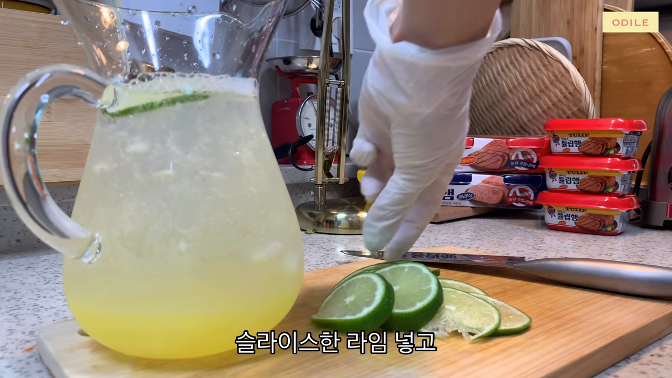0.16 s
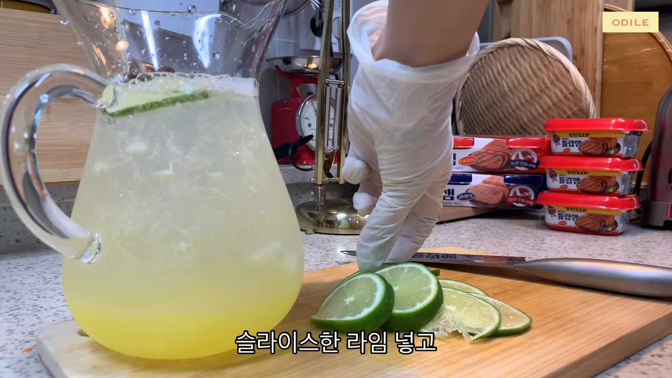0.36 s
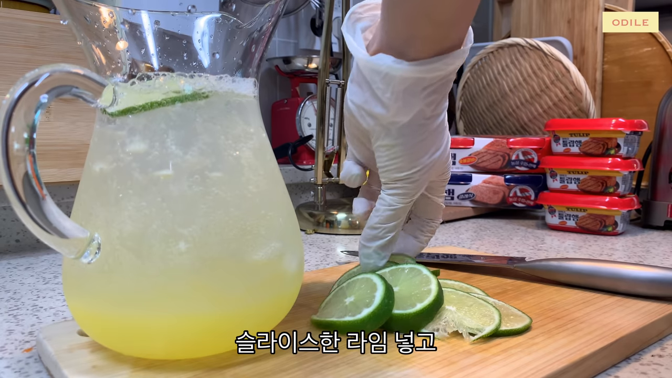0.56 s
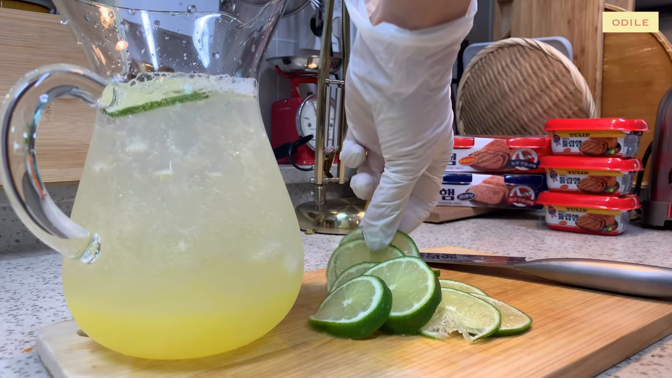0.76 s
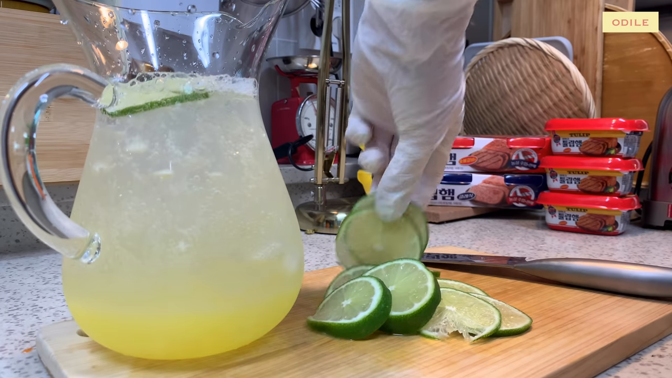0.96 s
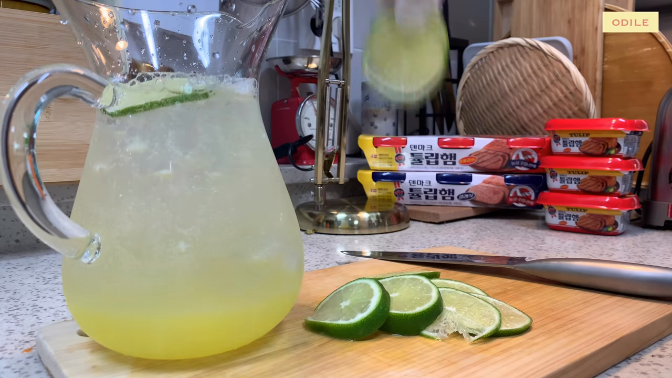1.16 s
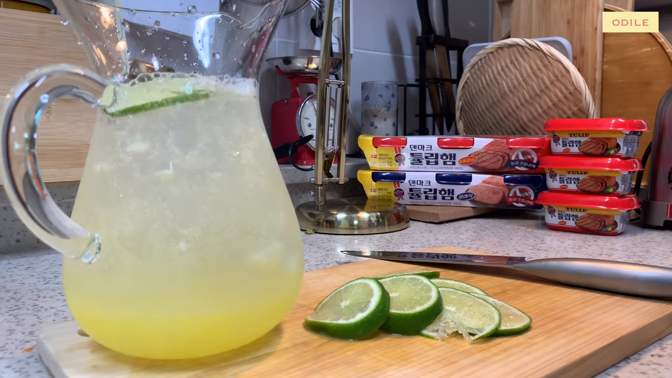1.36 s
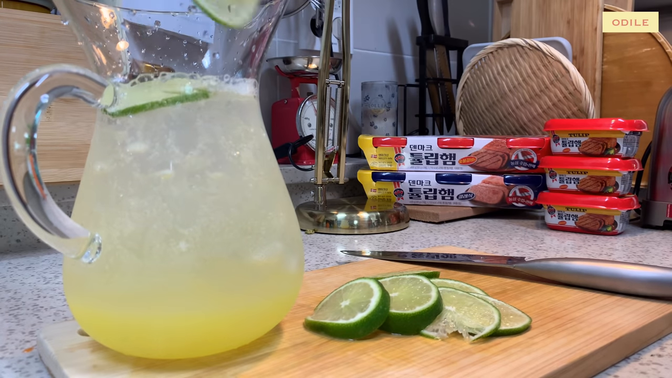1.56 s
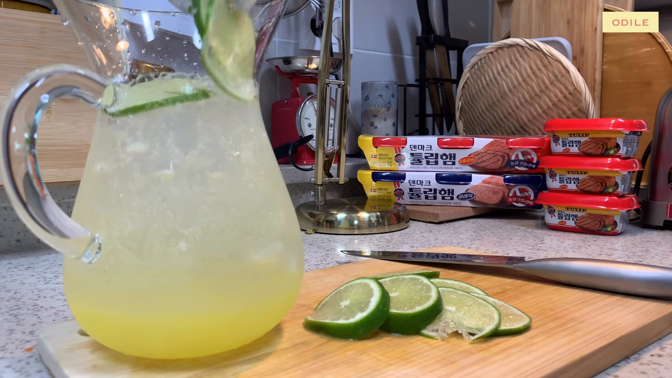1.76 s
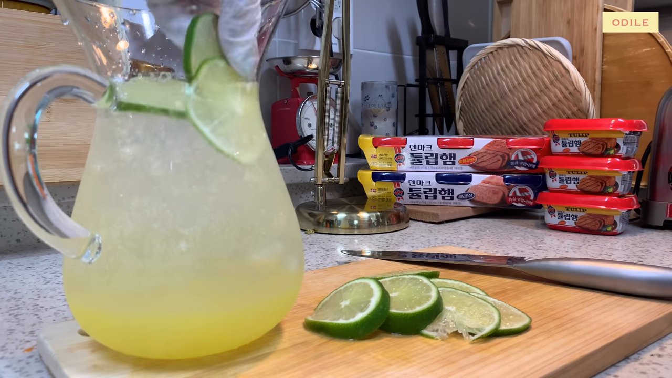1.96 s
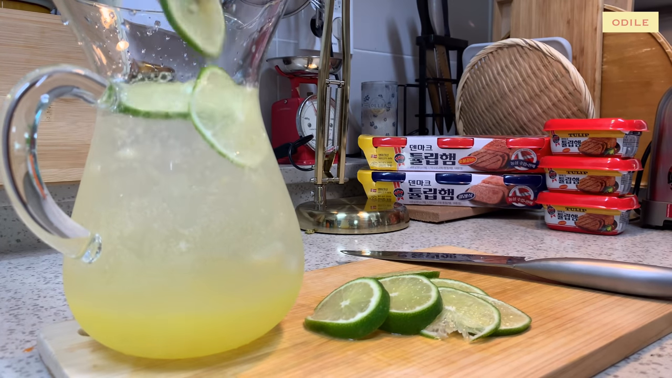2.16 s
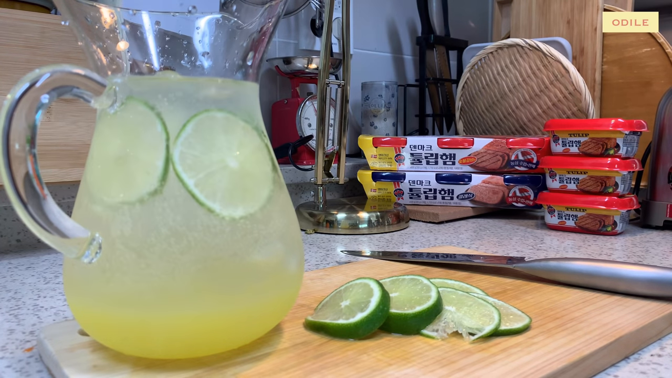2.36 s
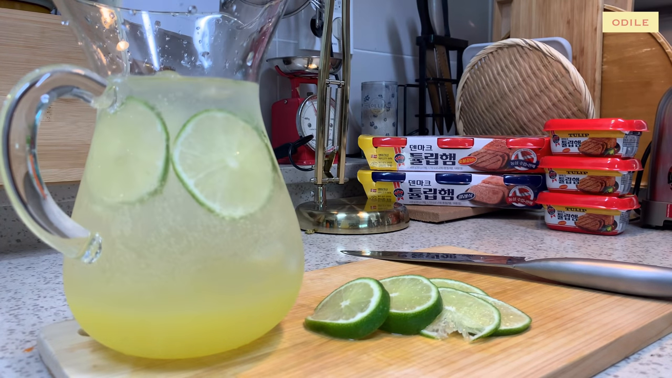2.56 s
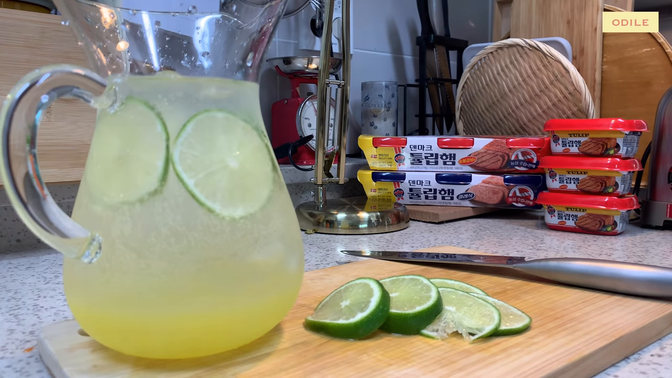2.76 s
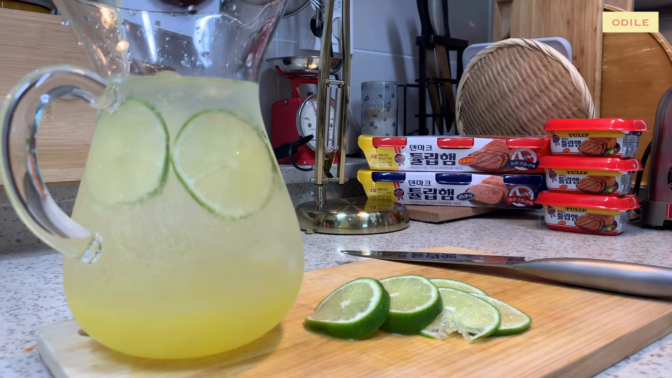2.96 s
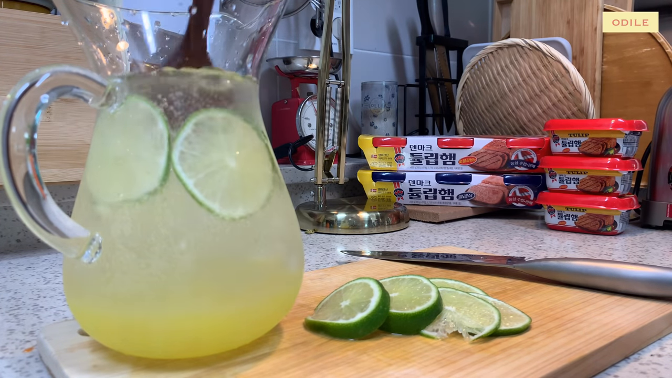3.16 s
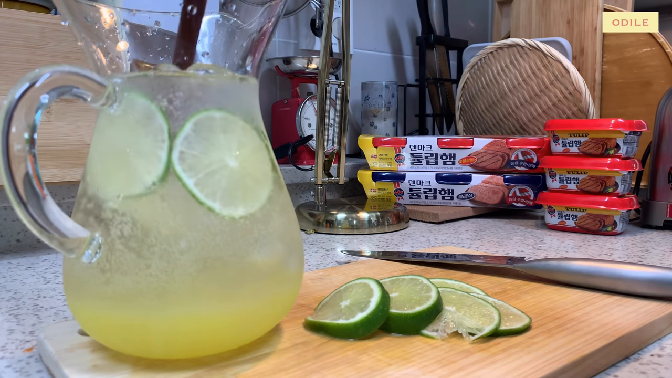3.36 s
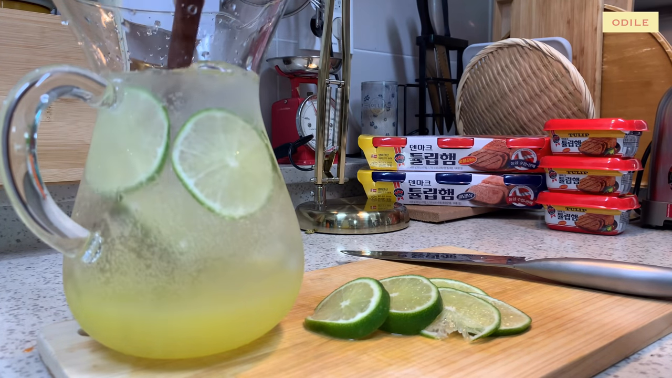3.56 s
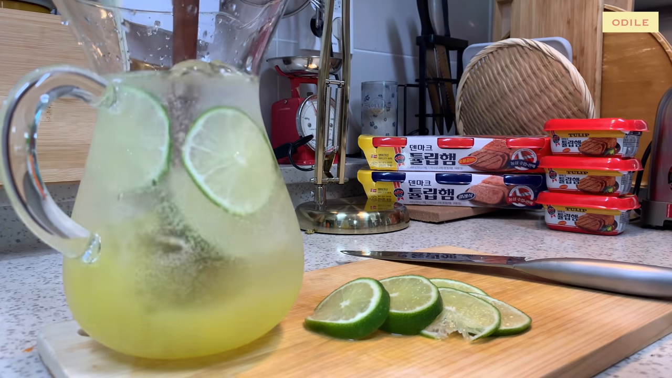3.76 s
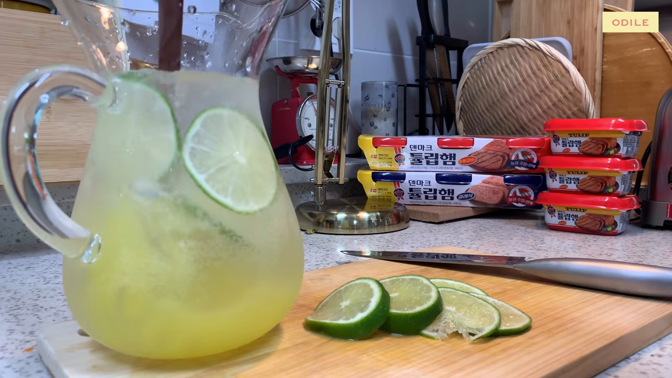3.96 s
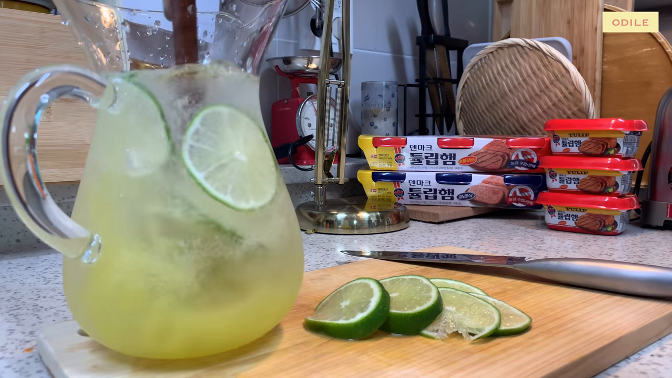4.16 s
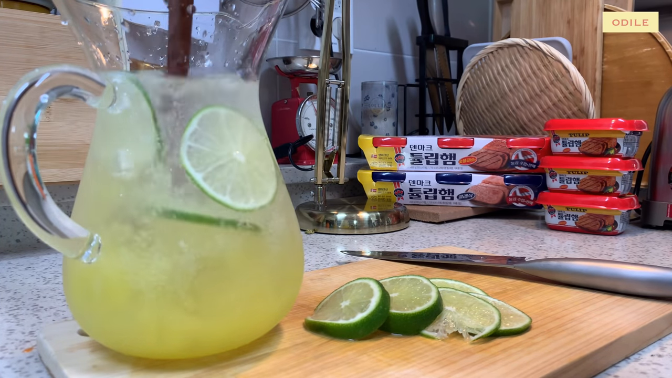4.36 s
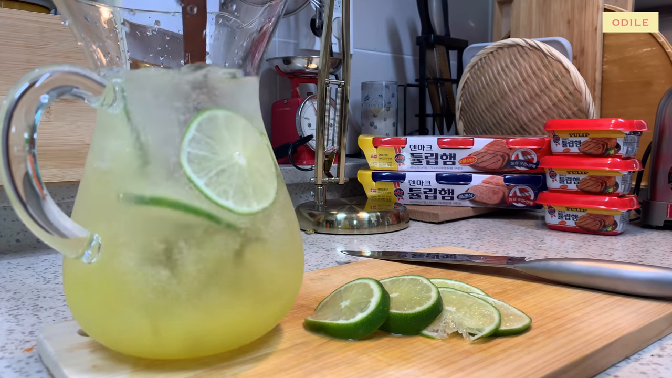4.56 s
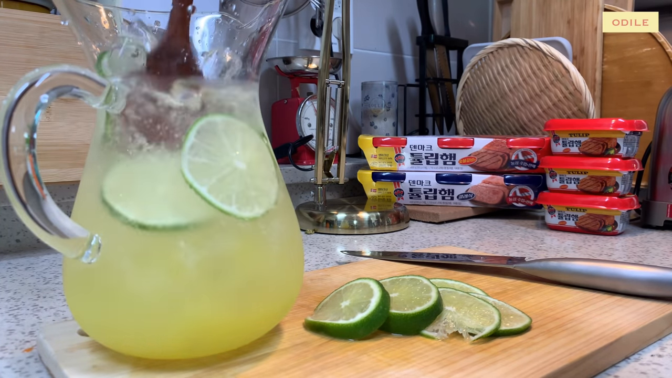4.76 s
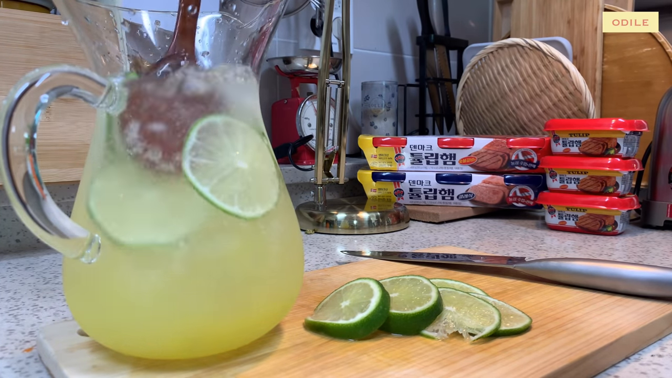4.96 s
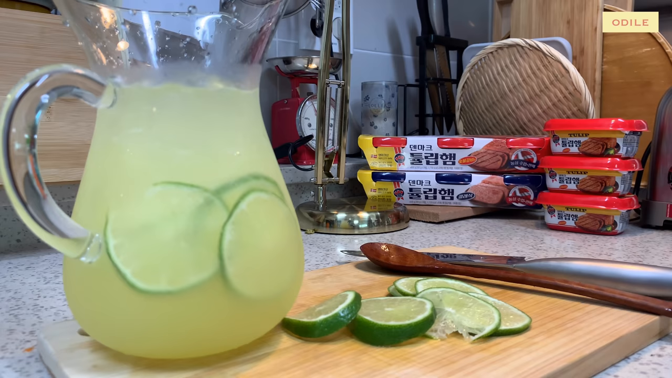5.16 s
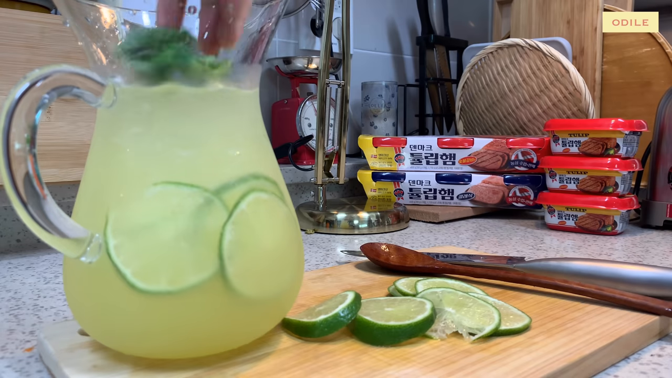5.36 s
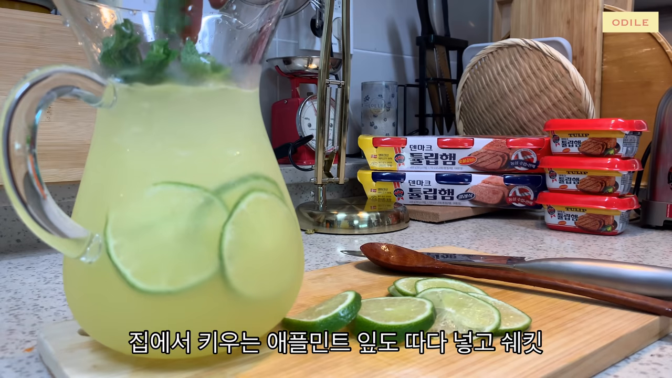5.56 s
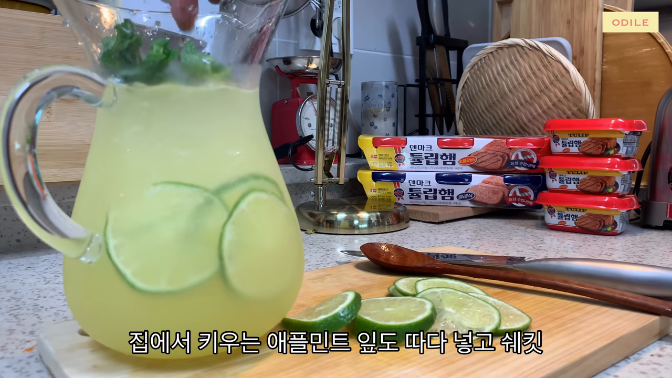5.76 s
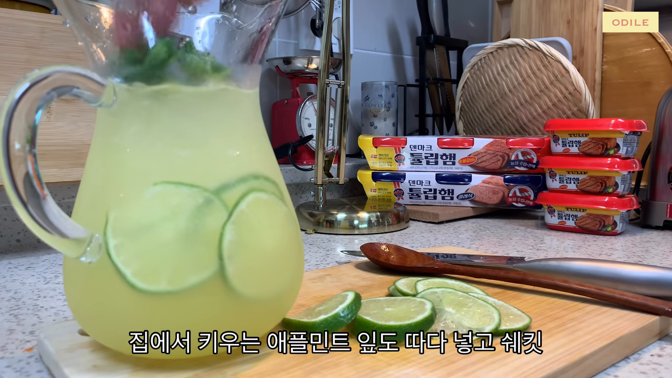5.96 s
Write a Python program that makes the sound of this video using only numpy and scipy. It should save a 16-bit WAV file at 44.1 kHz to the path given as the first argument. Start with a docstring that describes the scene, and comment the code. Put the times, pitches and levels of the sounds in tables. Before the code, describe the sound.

A wooden spoon stirs ice cubes and lime slices in a glass pitcher of fizzy drink, clinking and sloshing over a quiet refrigerator hum.

```python
"""A refrigerator hums in a quiet kitchen; a gloved hand crinkles, picks up slices and drops them in a pitcher.
A wooden spoon then stirs ice cubes and lime in the fizzy drink, and at the end leaves rustle at the rim.
Ice and glass are decaying modes struck by rattles; fizz and rustle are coloured grains of noise;
slosh is low noise with rising gurgles, and thumps are sinking tones. Sparse echoes give the room.
A close pair of microphone ports hears it all."""
import sys
import numpy as np
from scipy import signal
from scipy.fft import rfft, irfft
from scipy.io import wavfile
from scipy.ndimage import uniform_filter1d

SR = 44100
rng = np.random.default_rng(int(sys.argv[2]) if len(sys.argv) > 2 else 0)


def convert_level_to_amplitude(level_db):
    """Map a level in decibels to its linear amplitude factor."""
    exponent = np.asarray(level_db, float) / 20
    return 10 ** exponent


def store_wav(level_fs):
    """Save 16-bit WAV to argv[1]."""
    pcm = np.round(np.clip(np.atleast_2d(level_fs), -1, 1) * 32767)
    wavfile.write(sys.argv[1], SR, pcm.T.astype(np.int16))


N = 264600  # samples, 6 s

# the spoon goes round: time_s, jostle_of_cubes_db, fizz_and_splash_db, slosh_db
STIR = [(2.985, -48, -54, -45), (3.03, -42.5, -48.5, -49.5), (3.15, -44.5, -48, -50.5),
        (3.24, -53.5, -56, -42), (3.38, -41, -35.5, -45), (3.45, -45, -43.5, -35.5), (3.55, -41, -40, -52),
        (3.67, -42.5, -40, -42), (3.785, -45, -52.5, -54), (3.815, -37.5, -37, -49),
        (3.87, -36, -38.5, -41), (4.03, -46, -47.5, -50), (4.1, -37.5, -38, -49.5),
        (4.3, -42, -38.5, -49.5), (4.39, -43, -55, -47), (4.45, -40.5, -36, -48), (4.65, -37.5, -36, -45),
        (4.78, -41.5, -43.5, -52), (4.9, -35.5, -32.5, -45.5), (5.02, -47.5, -50, -50.5),
        (5.06, -46, -40.5, -46.5), (5.123, -53, -35.5, -49.5)]
# slices sink among the cubes, then the surface fizzes; two passages with the columns of STIR
DROPS = [
    [(1.7, -60, -64, -63), (1.78, -55.5, -68, -52), (1.876, -54, -58.5, -59), (1.93, -59.5, -68, -60),
     (2.195, -68, -73, -72)],
    [(2.25, -80, -73, -82), (2.4, -68.5, -67.5, -80), (2.49, -92, -82, -85), (2.6, -86, -97, -90)],
]


def evened(x):
    """Scales to an rms of 1."""
    return x / np.sqrt(np.mean(x ** 2) + 1e-20)


def read(points, hz):
    """Reads a spectrum table on a log-frequency axis."""
    f, value = np.transpose(points)
    return np.interp(np.log(hz + 1), np.log(f + 1), value)


def gain_over_time(tables, column=1):
    """Sums the gains that tables of dB draw over time, silent outside them."""
    t = np.arange(N) / SR
    gain = 0
    for rows in map(np.array, tables):
        gain = gain + convert_level_to_amplitude(np.interp(t, rows[:, 0], rows[:, column], -200, -200))
    return gain


def coloured(x, points):
    """Filters by a spectrum table, then scales to an rms of 1."""
    gain = convert_level_to_amplitude(read(points, np.fft.rfftfreq(N, 1 / SR)))
    return evened(irfft(rfft(x) * gain, N))


def grains(per_s, spread_db):
    """Sparse clicks of random sign at random moments; a few are large."""
    size = convert_level_to_amplitude(spread_db * np.minimum(rng.exponential(1, N), 4))
    sign = rng.choice([-1., 1.], N)
    return size * sign * (rng.random(N) < per_s / SR)


def add(mix, start_s, sound):
    """Lays a sound into the mix."""
    part = mix[round(start_s * SR):][:len(sound)]
    part += sound[:len(part)]


def refrigerator(steady=0.92):
    """Each hum line is a steady tone with a slow random waver around it."""
    # hum lines: pitch_hz, level_db, waver_width_hz
    hum_lines = [(54, -69, 15), (118.8, -55.5, 6), (238, -55.5, 2.4), (565.5, -72.5, 2.4),
                 (745, -84.5, 3.5), (948, -82.5, 7.7), (1520, -92, 8)]
    t, out = np.arange(N) / SR, 0
    for hz, level_db, width in hum_lines:
        r = np.exp(-np.pi * width / SR)
        noise = rng.standard_normal(N) + 1j * rng.standard_normal(N)
        waver = signal.lfilter([1], [1, -2 * r, r * r], noise)
        waver /= np.sqrt(np.mean(abs(waver) ** 2))
        envelope = steady + np.sqrt(1 - min(steady, 1) ** 2) * waver
        tone = (envelope * np.exp(2j * np.pi * hz * t)).real
        out = out + convert_level_to_amplitude(level_db) * np.sqrt(2) * tone
    return out


def kitchen_air(patchy_db=1.5, air_db=-55.5):
    """Broad rumble and faint hiss with drifting patches; the ports share the bass and differ in treble."""
    # spectrum of the air: pitch_hz, relative_level_db
    air_colour = [(20, -19.5), (50, -1.5), (114, -11), (166, -11.5), (236, -5.5), (309, -19.5), (560, -22),
                  (641, -30), (962, -30), (1230, -40), (2500, -43.5), (4500, -47), (8000, -43),
                  (15500, -50)]
    # likeness of the air at the two ports: pitch_hz, likeness_share
    air_likeness = [(40, .97), (100, .9), (250, .75), (550, .1), (1500, .1)]
    frames, hz = N // 512 + 5, np.fft.rfftfreq(2048, 1 / SR)
    a, b, c, d, patches = rng.standard_normal((frames, 1025, 5)).T
    patches = evened(uniform_filter1d(uniform_filter1d(patches, 16, 0), 8, 1))
    same = np.clip(read(air_likeness, hz), -1, 1)[:, None]
    left = a + 1j * b
    right = same * left + np.sqrt(1 - same ** 2) * (c + 1j * d)
    z = np.array([left, right])
    z *= convert_level_to_amplitude(read(air_colour, hz)[:, None] + patchy_db * patches)
    air = signal.istft(z, nperseg=2048, noverlap=1536)[1][:, :N]
    return convert_level_to_amplitude(air_db) * evened(air)


def rustle():
    """Crinkling glove, slices and leaves: swells of fine grains, and a few short bursts of noise as snaps."""
    # crinkles: peak_s, peak_gain_db, rise_db_per_s, fall_db_per_s
    crinkles = [(0.17, -72, 42, 40), (0.456, -78, 500, 150), (0.56, -79, 150, 150),
                (0.622, -65.5, 900, 152), (0.836, -62, 302, 1500), (0.86, -78, 300, 32),
                (2.746, -77, 700, 330), (2.806, -75, 900, 190), (5.23, -78, 900.5, 44),
                (5.326, -57, 1507, 900), (5.401, -62.5, 162, 408.5), (5.56, -74, 35.5, 401),
                (5.938, -46, 3000, 40)]
    # spectrum of the grains: pitch_hz, relative_level_db
    rustle_colour = [(500, -9), (900, -10.5), (2500, -1), (4000, -8.5), (6000, -8.5), (8000, -5.5),
                     (11000, -19), (15500, -16.5), (17000, -26)]
    # snaps: start_s, start_level_db
    snaps = [(0.266, -59), (0.517, -58), (0.531, -52.5), (0.542, -55), (0.558, -57), (0.622, -56),
             (0.669, -55), (0.831, -54), (2.9617, -44), (5.139, -51), (5.2275, -60), (5.27, -55),
             (5.3258, -46), (5.3947, -48), (5.9365, -62), (5.948, -43), (5.9694, -48)]
    peak_s, peak_db, rise, fall = np.transpose(crinkles)[:, :, None]
    late = np.arange(N) / SR - peak_s
    swells = convert_level_to_amplitude(peak_db + np.minimum(rise * late, -fall * late)).sum(0)
    out = swells * coloured(grains(2500, 5.8), rustle_colour)
    t = np.arange(900) / SR
    snap_t60_s = 0.012
    for (start_s, start_db), noise in zip(snaps, rng.standard_normal((len(snaps), 901))):
        burst = noise[1:] - 0.091 * noise[:-1]  # slightly brighter than white
        add(out, start_s, convert_level_to_amplitude(start_db - 60 * t / snap_t60_s) * burst)
    return out


def clink(knock_db, ring_db, crack_db, rattle_s, luck, uneven_db=3, first=2.1, rise_s=.001):
    """One cube strikes: a first contact and a rattle ring every mode by its own chance amount."""
    # ice cubes, heavily damped by the drink: pitch_hz, level_db, t60_s, pitch_spread_share
    ice_modes = [(575, -22, 0.014, 0.32), (840, -16, 0.012, 0.027), (1075, -5, 0.0062, .1),
                 (1326, -8.5, 0.017, 0.019), (1613, -3.5, 0.014, 0.069), (1985, 1, 0.0049, 0.023),
                 (2530, -7, .007, 0.36), (2980, -9, 0.009, 0.047), (4400, 6.5, 0.00063, 0.13),
                 (4940, -0.5, 0.0045, 0.1), (6070, 4.5, 0.0034, 0.19), (7320, 7.5, 0.0051, 0.089),
                 (9114, 3, 0.0044, 0.061), (11440, 4, 0.0014, 0.033), (12700, -10, 0.0024, 0.03),
                 (15000, -10.5, .002, 0.054)]
    # the pitcher's wall: pitch_hz, level_db, t60_s, pitch_spread_share
    glass_modes = [(2525, -0.5, 0.0085, 0.066), (3305, -12, 0.024, 0.011), (3572, -8, 0.015, 0.0058),
                   (3727, -5, 0.018, 0.0034), (3765, -7, 0.0057, 0.0083), (4210, -13.5, 0.024, 0.0018)]
    hz, db, t60, spread = np.transpose(ice_modes + glass_modes)[:, :, None]
    count = len(hz)
    detune, uneven, contacts = luck[:count, None], luck[count:2 * count, None], luck[2 * count:]

    # the ice modes blend from dull knock at 1400 Hz to sharp crack at 6000 Hz
    part_db = np.interp(np.log(hz), np.log([1400, 6000]), [knock_db, crack_db])
    part_db[len(ice_modes):] = ring_db
    t = np.arange(1800) / SR
    decay = convert_level_to_amplitude(part_db + db + uneven_db * uneven - 60 * t / t60)
    rings = decay * np.sin(2 * np.pi * hz * (1 + spread * detune) * t)

    t = t[:len(contacts)]
    envelope = np.exp(-t / max(rattle_s, 1e-4)) * (1 - np.exp(-t / rise_s))
    rattle = contacts ** 3 * envelope  # cubed: a few contacts stand out
    rattle /= abs(rattle).max()
    rattle[round(rise_s * SR / 2)] = first
    return signal.fftconvolve(rings.sum(0), rattle / np.linalg.norm(rattle))


def blows():
    """The distinct clinks: short ones are one clean contact, long ones swell into a rattle."""
    # ice blows, single ticks to long rattles: start_s, dull_knock_db, glass_ring_db, crack_db, rattle_s
    blow_rows = [(1.719, -45, -39.5, -54, 0.0041), (1.756, -28.5, -48, -63, 0.0016),
                 (1.819, -34, -56, -67, 0.0076), (1.852, -31.5, -43.5, -57, 0.0033),
                 (1.954, -36.5, -51, -73, 0.0046), (2.009, -52, -48, -53.5, .004),
                 (2.063, -44.5, -48, -81, .005), (2.116, -52, -41.5, -51, 0.0024),
                 (2.311, -50.5, -56, -39, 0.0014), (2.984, -24, -31, -31.5, 0.0024),
                 (3.003, -63, -25.5, -24, 0.0056), (3.061, -53, -55, -34.5, 0.0015),
                 (3.071, -43, -48, -30.5, 0.0036), (3.123, -53, -33, -25.5, 0.0024),
                 (3.1405, -61, -54, -39, 0.0013), (3.154, -34.5, -60, -26, .002),
                 (3.18, -43, -59, -31, .001), (3.210, -22.5, -53, -33, 0.0054),
                 (3.223, -64, -61, -23, 0.0051), (3.2514, -52, -60, -30, 0.0017),
                 (3.3, -23.5, -55, -32, 0.0049), (3.323, -37, -62, -28.5, 0.0011),
                 (3.36, -25.5, -45, -30, 0.0096), (3.424, -24.5, -57, -30.5, 0.0041),
                 (3.441, -28.5, -34, -20, 0.0041), (3.561, -27, -31, -40, 0.0033),
                 (3.585, -64, -39, -26, 0.0032), (3.612, -39, -30, -25.5, 0.0091),
                 (3.632, -50, -43, -30, 0.0022), (3.6553, -27.5, -42, -33, .001),
                 (3.691, -30, -37, -25, .004), (3.818, -31, -24, -26.5, .002),
                 (3.828, -27, -21, -21.5, 0.011), (3.863, -26, -28, -22.5, .005),
                 (3.915, -42, -50, -20.5, 0.0052), (3.963, -20.5, -48, -21, 0.0031),
                 (4.01, -51, -33, -37, .002), (4.052, -29.5, -33, -19.5, 0.0013),
                 (4.08, -40.5, -34, -23, 0.0054), (4.094, -31.5, -38.5, -26, 0.0019),
                 (4.101, -42, -50, -31, 0.0015), (4.125, -26, -50, -27.5, 0.0039),
                 (4.164, -32.5, -40, -29.5, .003), (4.262, -28.5, -37, -44, 0.0024),
                 (4.275, -23.5, -19.5, -22, 0.0084), (4.307, -50.5, -34.5, -22.5, 0.00075),
                 (4.313, -42.5, -37.5, -22, .002), (4.367, -24, -57, -54, 0.0038),
                 (4.436, -38.5, -24.5, -44, 0.003), (4.449, -27, -49.5, -29, 0.0037),
                 (4.482, -57.5, -32.5, -21, .003), (4.4904, -56, -33.5, -35, 0.00085),
                 (4.535, -42, -29, -40, .004), (4.557, -43, -31, -27, .004), (4.570, -40.5, -31, -38, .002),
                 (4.641, -34, -22, -18.5, 0.0057), (4.696, -48, -16.5, -18.5, 0.0031),
                 (4.717, -27.5, -17.5, -29, 0.0095), (4.746, -28.5, -22, -39.5, 0.0036),
                 (4.794, -37, -19.5, -24.5, 0.0057), (4.829, -19.5, -13, -22.5, 0.0074),
                 (4.856, -39.5, -22.5, -26.5, 0.0046), (4.866, -17.5, -22, -34.5, .006),
                 (4.912, -46.5, -26, -32.5, .002), (4.921, -47, -16.5, -23, 0.0077),
                 (5.001, -46, -32, -27.5, 0.0011), (5.035, -40, -21, -27.5, 0.0035),
                 (5.056, -40.5, -46.5, -26, 0.0082), (5.084, -59, -41.5, -20.5, 0.0039),
                 (5.105, -53, -22, -25, 0.004)]
    build_share = 0.6  # a rattle builds over this share of its length
    clean_s = 0.0028  # in a rattle this short the first contact is as strong as the strongest
    out, luck = np.zeros(N), rng.standard_normal((len(blow_rows), 1800))
    for (start_s, *parts, rattle_s), chance in zip(blow_rows, luck):
        first, rise_s = clean_s / rattle_s, build_share * rattle_s
        add(out, start_s, clink(*parts, rattle_s, chance, first=first, rise_s=rise_s))
    return out


def jostle(knock_db, ring_db, crack_db, per_s, spread_db):
    """Cubes nudge each other or the wall all the time: a rain of small clinks of nine shapes."""
    hits, cube = grains(per_s, spread_db), rng.integers(0, 9, N)
    out = 0
    for k, chance in enumerate(rng.standard_normal((9, 500))):
        shape = clink(knock_db, ring_db, crack_db, 0.0047, chance)
        out = out + signal.oaconvolve(hits * (cube == k), shape)[:N]
    return evened(out)


def churn():
    """Jostling cubes and bursting bubbles; the fizz comes in clumps as cubes break the surface."""
    # spectrum of the fizz: pitch_hz, relative_level_db
    fizz_colour = [(300, -28.5), (1500, -4.5), (3000, 3.5), (4500, 0), (7500, 0.5), (9500, -3),
                   (12000, -8.5), (15500, -11), (17000, -35)]
    drift = evened(uniform_filter1d(rng.standard_normal(N), 250))
    clumps = convert_level_to_amplitude(6 * np.clip(drift, -3, 1.5))
    fizz = coloured(clumps * grains(2500, 5.0), fizz_colour)
    cubes = jostle(0, -24.5, -12.5, 250, 2.9)
    wall = jostle(-39.5, 0, -39.5, 300, 1.4)
    # cubes slide on the glass, in dB relative to the jostle: more as the swirl builds
    swirl = convert_level_to_amplitude(-13 + 7.5 * (np.arange(N) / SR - STIR[0][0]))
    passages = DROPS + [STIR]
    bubbling = gain_over_time(passages, column=2) * fizz
    return gain_over_time(passages) * cubes + bubbling + gain_over_time([STIR]) * swirl * wall


def gurgles(per_s=120):
    """Pockets of air under the spoon: short low tones that slide upward."""
    hits, pocket, out = grains(per_s, 5.1), rng.integers(0, 6, N), 0
    t = np.arange(3000) / SR
    envelope = convert_level_to_amplitude(-60 * t / 0.041) * (1 - np.exp(-t / .003))
    for k, hz in enumerate(np.geomspace(150, 310, num=6)):
        tone = np.sin(2 * np.pi * hz * (t + 4 * t ** 2)) * envelope
        out = out + signal.oaconvolve(hits * (pocket == k), tone)[:N]
    return evened(out)


def rocking():
    """Slosh of low noise and gurgles, with thumps whose pitch sinks as the pitcher rocks on the board."""
    # spectrum of the slosh noise: pitch_hz, relative_level_db
    slosh_colour = [(30, -24), (60, -0.5), (180, 4), (300, 9), (400, -24.5), (900, -38)]
    # the spoon meets the bottom: start_s, level_db (before rise and decay), rest_pitch_hz
    thumps = [(3.028, -27, 50), (3.216, -28.5, 58), (3.368, -32, 55), (3.439, -37, 55), (3.97, -17.5, 48),
              (4.375, -19.5, 48), (4.488, -37, 50), (4.664, -28, 85), (4.847, -32, 60), (4.94, -31, 80)]
    slosh = 0.61 * coloured(rng.standard_normal(N), slosh_colour) + 0.61 * gurgles()
    out = gain_over_time(DROPS + [STIR], column=3) * slosh
    t = np.arange(6000) / SR
    for start_s, level_db, rest_hz in thumps:
        turns = np.cumsum(rest_hz + 90 * np.exp(-t / 0.0099)) / SR
        envelope = convert_level_to_amplitude(level_db - 60 * t / 0.16) * (1 - np.exp(-t / 0.021))
        add(out, start_s, np.sin(2 * np.pi * turns) * envelope)
    return out


def walls(x, half_turns_per_s=4):
    """Sparse reflections, each band dying at its own speed; three sets take turns as the sources move."""
    # decay of the kitchen's echoes: pitch_hz, t60_s
    kitchen_t60 = [(250, 0.099), (1000, 0.14), (4000, 0.15), (12000, 0.085)]
    taps = np.zeros((3, 2, 10000))  # set, port, sample
    at = np.arange(60, 9960, 20) + rng.integers(0, 20, (3, 2, 495))
    np.put_along_axis(taps, at, rng.choice([-1., 1.], at.shape), 2)
    hz, t, z = signal.stft(taps, SR, nperseg=256)
    decay = convert_level_to_amplitude(-60 * t / read(kitchen_t60, hz)[:, None])
    tails = signal.istft(z * decay, SR, nperseg=256)[1]
    turn = np.pi * (half_turns_per_s * np.arange(len(x)) / SR + np.arange(3)[:, None] / 3)
    shares = np.sqrt(2 / 3) * np.cos(turn)  # squares sum to 1
    echoes = signal.oaconvolve((x * shares)[:, None], tails / np.linalg.norm(tails[0, 0]), axes=2)
    return echoes.sum(0)[:, :len(x)]


def ports(x):
    """The two ports hear a near source with a frequency-dependent lead and lean."""
    # phase by which the left port leads: pitch_hz, lead_radians
    left_lead = [(0, 0), (1000, 1), (2000, 3), (3000, 3.8), (4300, 6.3), (5000, 6.5), (6200, 4.2)]
    # level of the left port over the right: pitch_hz, left_over_right_db
    left_lean = [(100, 13.5), (400, 4), (800, 9), (2200, 4), (3200, 1.5), (5000, -4.5), (6500, -6.5)]
    hz = np.fft.rfftfreq(N, 1 / SR)
    half = convert_level_to_amplitude(read(left_lean, hz) / 2) * np.exp(.5j * np.interp(hz, *np.transpose(left_lead)))
    return irfft(rfft(x) * np.array([half, 1 / half]), N)


def scene():
    """Pitcher and hand with their echoes, over the hum of the kitchen."""
    # moments at which the echoes break off: time_s
    echo_breaks = [2.192, 5.124]
    # a high-pass at 525 Hz thins the lows of the clinks, the fizz and the hand's sounds
    thin_lows = signal.butter(4, 525, "high", fs=SR, output="sos")
    pitcher, hand = signal.sosfilt(thin_lows, [blows() + churn(), rustle()])
    low = rocking()  # alike at both ports

    # below 200 Hz the walls add nothing that the two ports hear apart
    room_bass = signal.butter(2, 200, "high", fs=SR, output="sos")
    sent = convert_level_to_amplitude(-3) * pitcher + convert_level_to_amplitude(-4) * hand + convert_level_to_amplitude(-3) * signal.sosfilt(room_bass, low)
    stretches = np.split(sent, [round(s * SR) for s in echo_breaks])
    echoes = np.hstack([walls(stretch) for stretch in stretches])
    return ports(pitcher + hand) + low + echoes + kitchen_air() + refrigerator()


def top_cut(x):
    """Nothing passes above the cut-off."""
    return signal.sosfilt(signal.butter(12, 16970, fs=SR, output="sos"), x)


def record(dry):
    """Treble comes mostly from the right port, later in the left channel; then a bass cut and band limit."""
    one_port_hz, lag_s = 6300, 3 / 14000
    bass_hz, edge_hz = 40, 16000
    hz, (left, right) = np.fft.rfftfreq(N, 1 / SR), rfft(dry)
    treble = .96 / (1 + (one_port_hz / (hz + 1)) ** 24)
    late_right = right * np.exp(-2j * np.pi * hz * lag_s)
    left = np.sqrt(1 - treble ** 2) * left + treble * late_right
    bass_cut = (hz / bass_hz) ** 3 / (1 + (hz / bass_hz) ** 3)
    passed = bass_cut / (1 + (hz / edge_hz) ** 120)
    mix = irfft(passed * np.array([left, right]), N)
    return top_cut(mix)


dry = scene()
out = record(dry)
store_wav(out)
```